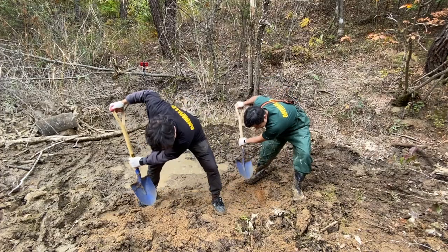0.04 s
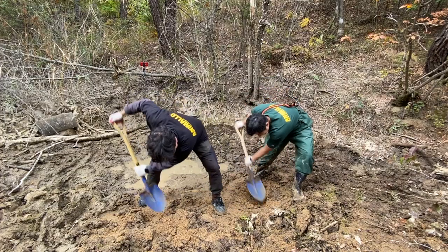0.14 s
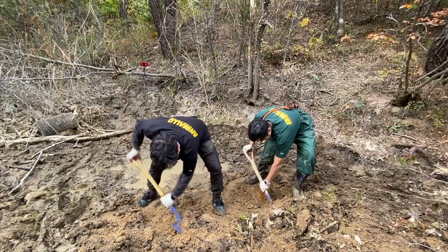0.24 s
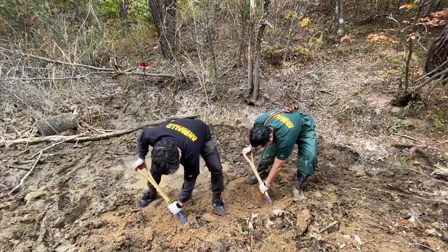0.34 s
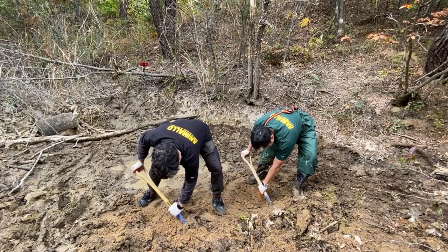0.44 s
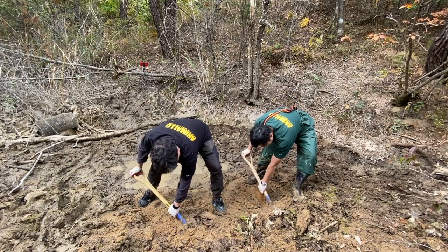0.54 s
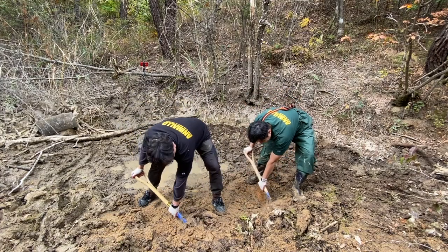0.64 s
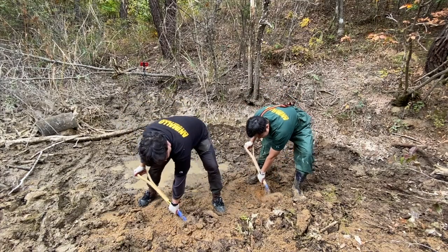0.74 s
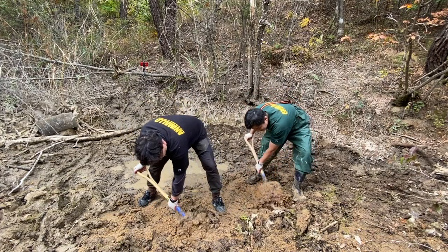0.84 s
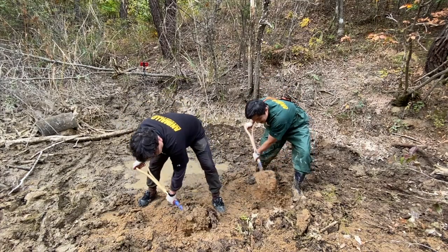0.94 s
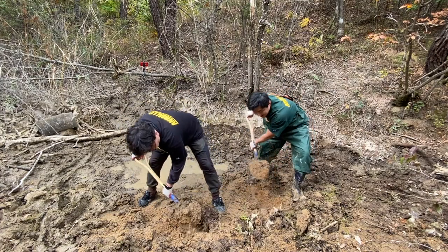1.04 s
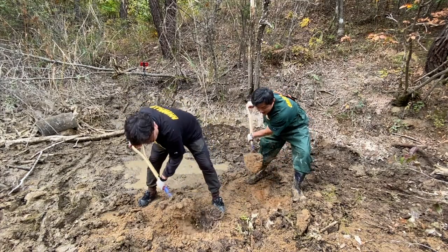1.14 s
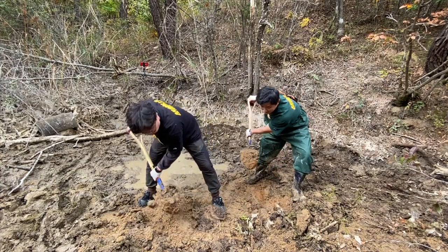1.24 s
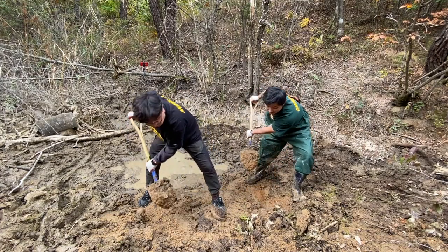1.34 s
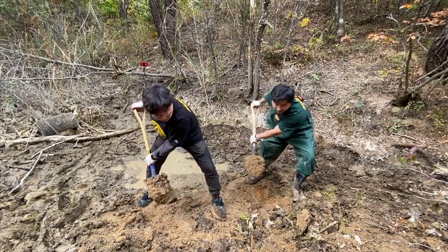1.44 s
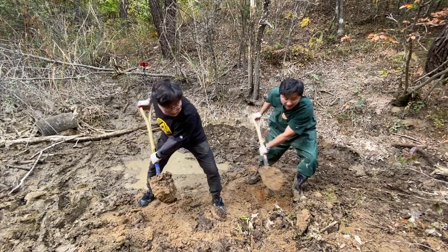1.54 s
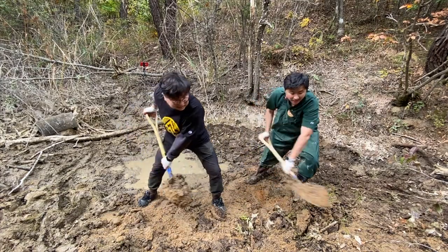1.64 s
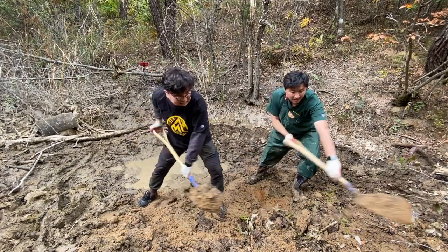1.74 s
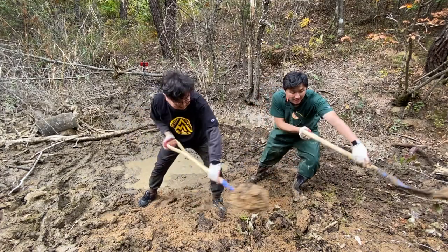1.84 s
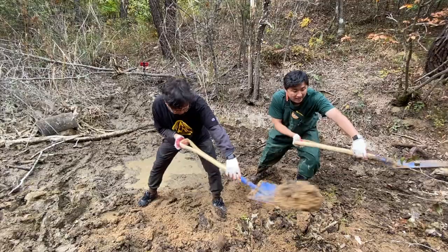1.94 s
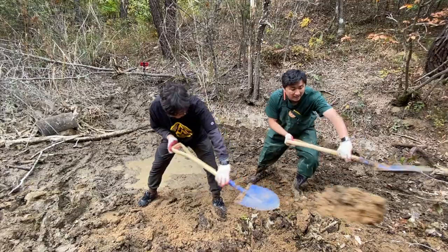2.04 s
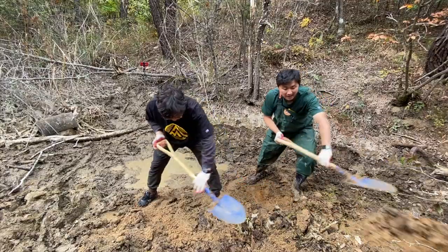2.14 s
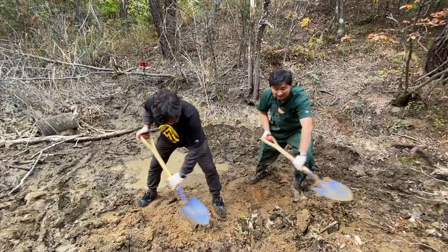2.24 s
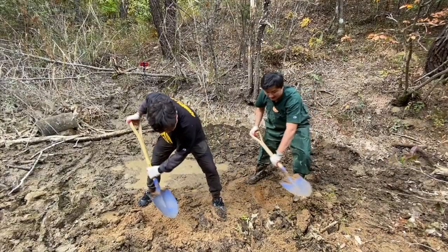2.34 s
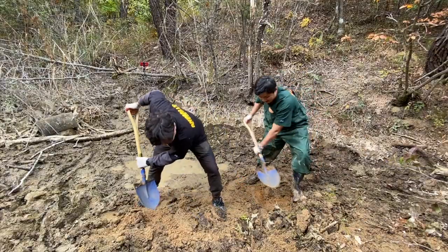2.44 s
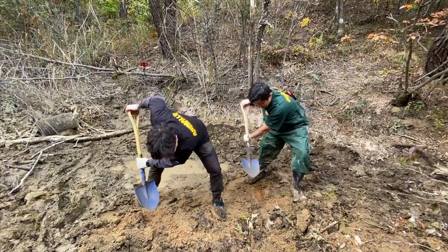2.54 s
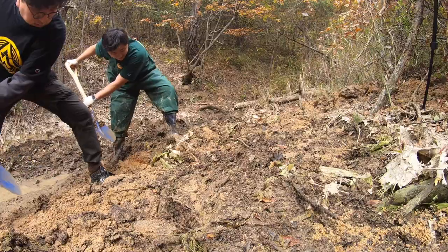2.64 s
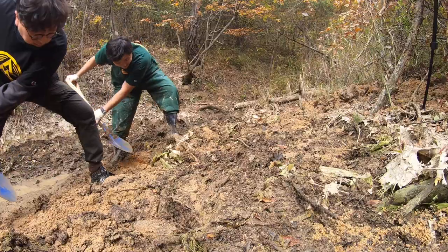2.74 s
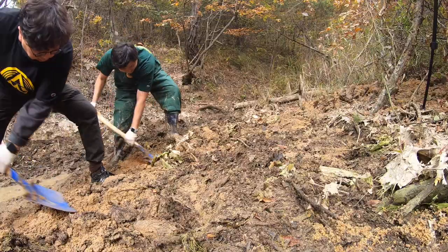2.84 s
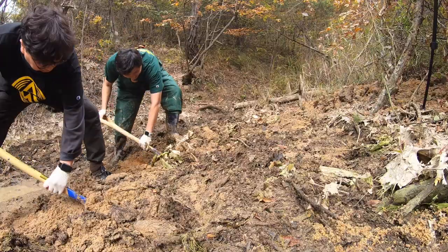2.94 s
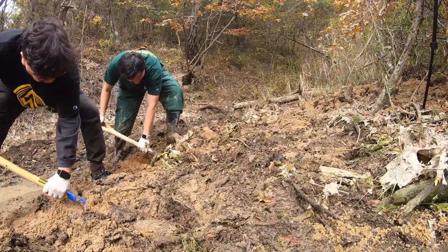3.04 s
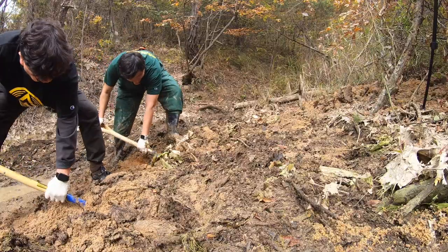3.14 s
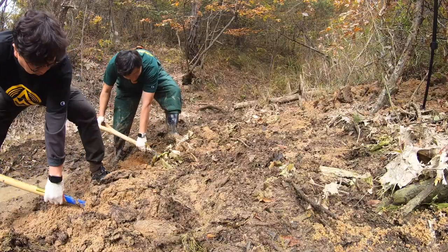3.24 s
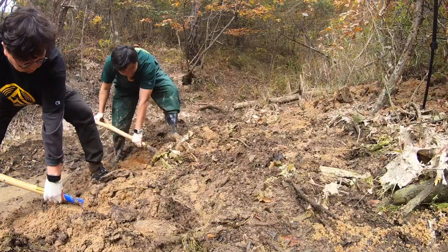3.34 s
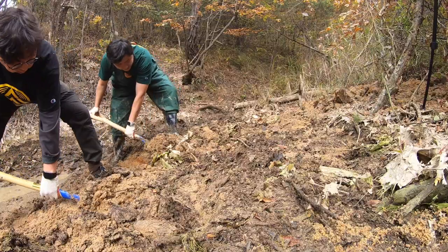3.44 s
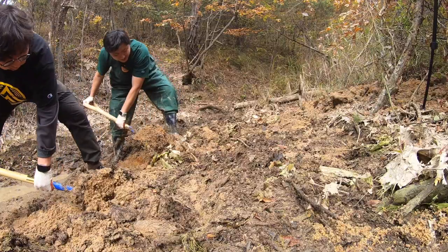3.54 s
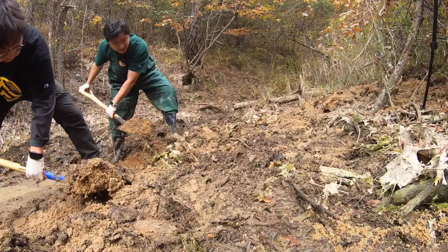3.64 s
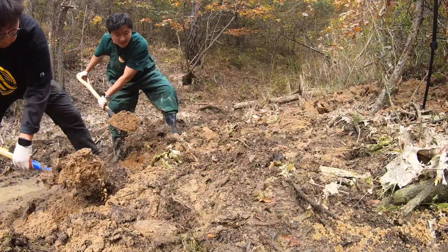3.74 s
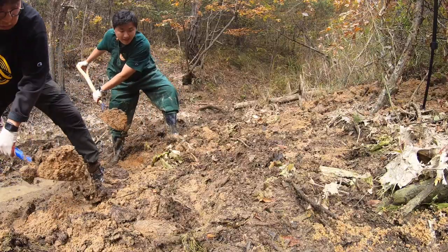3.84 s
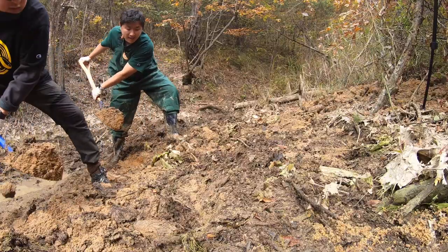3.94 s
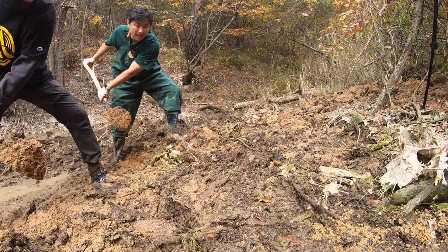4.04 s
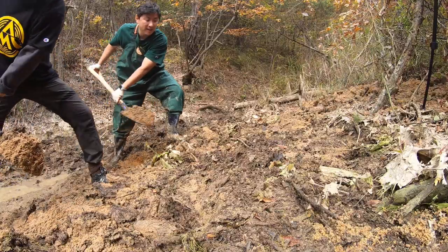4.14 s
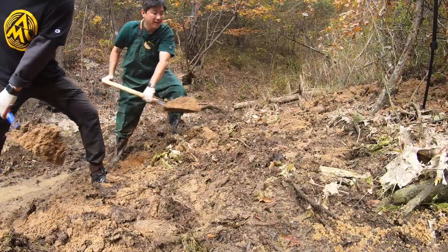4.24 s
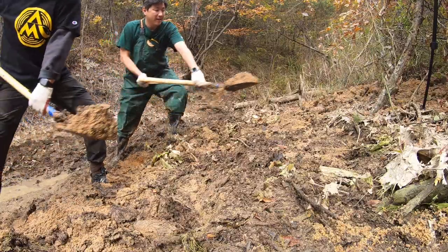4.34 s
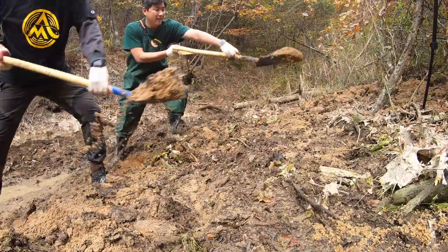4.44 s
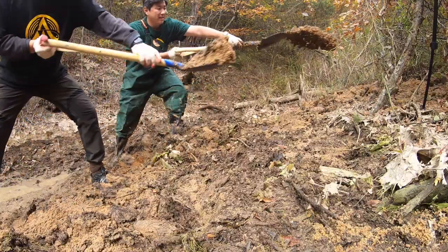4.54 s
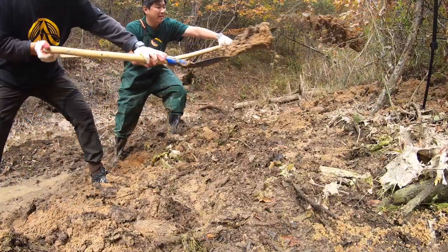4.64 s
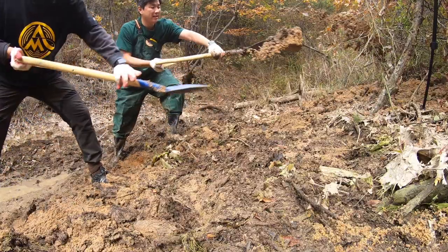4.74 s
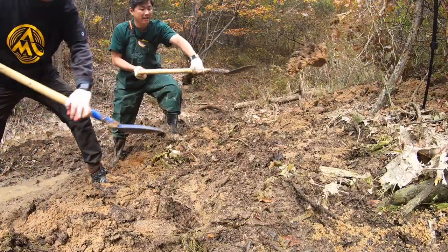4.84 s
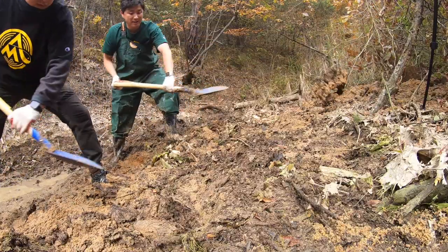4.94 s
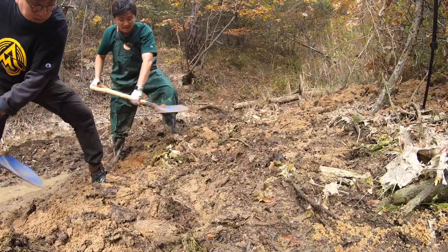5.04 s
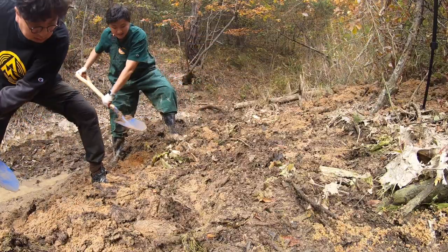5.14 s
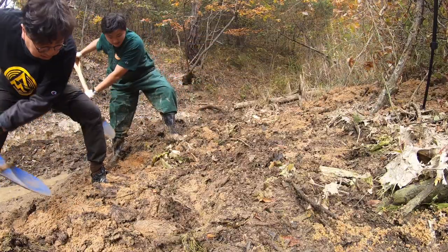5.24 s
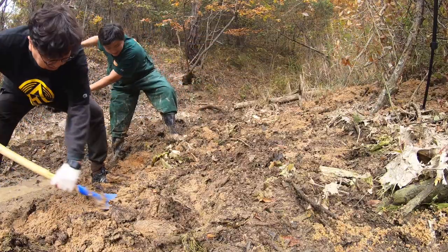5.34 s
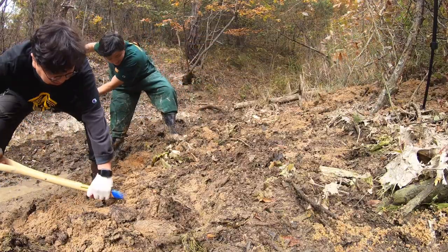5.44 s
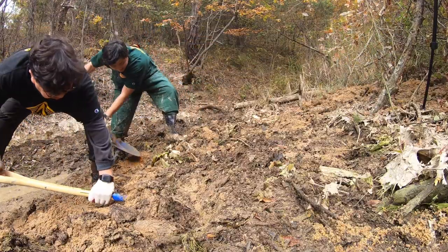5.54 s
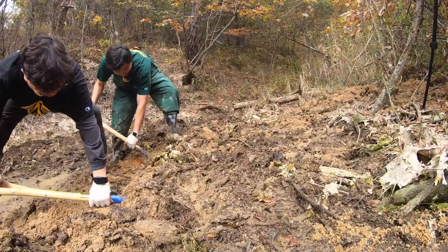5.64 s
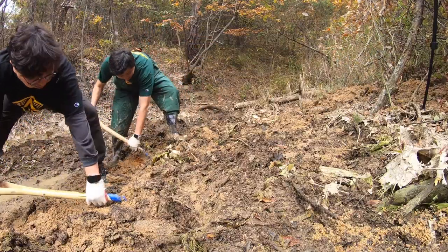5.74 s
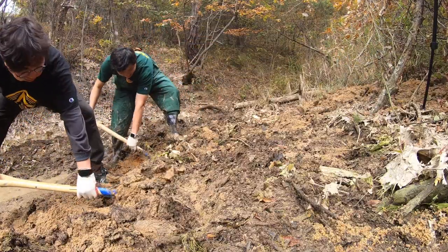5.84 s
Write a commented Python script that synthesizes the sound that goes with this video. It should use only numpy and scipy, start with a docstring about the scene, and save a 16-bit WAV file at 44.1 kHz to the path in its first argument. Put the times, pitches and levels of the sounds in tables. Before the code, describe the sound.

Steel shovel blades stab gritty wet ground, soil slides off with a hiss, and clods and crumbs land softly among trees.

```python
"""Steel shovels dig wet, gritty soil in a wood: two people stab the ground, lever up a load and fling it.
Blades, crumbs, soil and the slope's echo are clumped rows of tiny contacts, each in its own colour.
The load hisses off the blade, then lands as soft clods and a patter of crumbs; the trees answer faintly.
Decaying noise bands make the snaps, narrow noise the far whistles, steady noise the hush of the wood.
A bright microphone with spaced ports hears the first round, a duller one near the ground the second."""
import sys
import numpy as np
from scipy import signal
from scipy.fft import rfft, irfft, next_fast_len
from scipy.io import wavfile
from scipy.ndimage import map_coordinates

SR = 44100
rng = np.random.default_rng(int(sys.argv[2]) if len(sys.argv) > 2 else 0)


def log_audio(samples):
    """Write samples as a 16-bit WAV file to the path given in sys.argv[1]."""
    # one column per channel
    frames = np.atleast_2d(samples).T
    # limit to full scale, then quantise
    limited = np.clip(frames, -1, 1)
    pcm = np.round(limited * 32767).astype(np.int16)
    wavfile.write(sys.argv[1], SR, pcm)


N = 259749

SWITCH_S = 2.745  # the second microphone takes over
TIME = np.arange(N) / SR
SIZE = next_fast_len(N + SR // 2)
FREQ = np.fft.rfftfreq(SIZE, 1 / SR)

# the pit from the first microphone: (frequency [Hz], left minus right [dB])
PIT_FIRST = [(200, 2.5), (600, 2.5), (1400, 2), (2200, 4.5), (3500, -1), (5400, 9), (9000, -1)]
# the pit from the second microphone: (frequency [Hz], left minus right [dB])
PIT_SECOND = [(450, 0.41), (1150, 7.8), (2200, 5.8), (4000, 2.4), (6500, 0.5), (12000, 0.32)]
# colour of fine crumbs: (frequency [Hz], relative level [dB])
PATTER_COLOUR = [(400, -16.5), (850, -12), (1250, -3), (2000, -1), (4000, -1.5), (5800, -1.5), (10000, 0),
                 (15000, -8)]


def amp(db):
    """Decibels to gain."""
    return 10 ** (np.asarray(db) / 20)


def unit(x):
    """Scaled to rms 1."""
    return x / np.sqrt(np.mean(x ** 2) + 1e-20)


def along(points, hz=FREQ):
    """(Hz, value) points joined on a log frequency axis."""
    f, v = np.transpose(points)
    return np.interp(np.log(hz + 1), np.log(f + 1), v)


def wobble(rate):
    """A smooth random curve with rate knots a second."""
    knots = rng.standard_normal(int(N * rate / SR) + 4)
    return map_coordinates(knots, [TIME * rate])


def filtered(x, response):
    """x shaped by a response on the frequency grid."""
    return irfft(rfft(x, SIZE) * response, SIZE)[..., :N]


def noise_band(response):
    """Two unrelated rows of steady noise shaped by a response; rms 1."""
    return unit(filtered(rng.standard_normal((2, N)), response))


def resonance(hz, width):
    """One causal resonance of peak gain 1; width in Hz."""
    return 1j * FREQ * width / (hz * hz - FREQ ** 2 + 1j * FREQ * width)


def steel(ring_db):
    """Direct contact noise plus the resonances of a blade damped by soil."""
    # blade resonances: (frequency [Hz], width [Hz], relative level [dB])
    blade_modes = [(480, 150, -4.5), (814, 81, -6.5), (1448, 96, 0), (2074, 180, -6), (2740, 93, -9.5),
                   (3860, 570, -17.5), (4890, 300, -10), (5430, 120, -5)]
    ring = sum(amp(db) * resonance(hz, width) for hz, width, db in blade_modes)
    return 1 + amp(ring_db) * ring


def grains(colour, rate, spread_db, clump_db):
    """Two rows of unrelated tiny contacts, rate a second, of random size in shared clumps; rms 1."""
    contacts = (rng.random((2, N)) < rate / SR) * rng.choice([-1, 1], (2, N))
    scatter = spread_db * np.clip(rng.standard_normal((2, N)), -2, 2)
    size = amp(scatter + clump_db * wobble(170))
    return unit(filtered(contacts * size, colour))


def soil(fine, body, colour, rate, spread_db, clump_db):
    """Moving soil: fine sharp grains over the dull knocks of larger crumbs, each under its own gain."""
    # colour of larger crumbs: (frequency [Hz], relative level [dB])
    body_colour = [(60, -27), (200, 5), (500, 4), (900, 3.5), (1500, -4.5), (4000, -46)]
    sharp = fine * grains(colour, rate, spread_db, clump_db)
    dull = body * grains(amp(along(body_colour)), rate=990, spread_db=3, clump_db=2.0)
    return sharp + dull


def burst(s, t60, attack=1 / 4000):
    """A gain that jumps up at s and dies by 60 dB in t60 seconds; attack is its rise constant in seconds."""
    age = np.maximum(TIME - s, 0)
    return (1 - np.exp(-age / attack)) * amp(np.maximum(-60 * age / t60, -200))


def swell(s, length, rise_db_per_s, fall_db_per_s):
    """A gain that grows until s, holds for length seconds, then dies."""
    before, after = np.maximum(s - TIME, 0), np.maximum(TIME - s - length, 0)
    return amp(-rise_db_per_s * before - fall_db_per_s * after)


def same_round(s):
    """True for the samples heard by the microphone that is listening at s."""
    return (TIME < SWITCH_S) == (s < SWITCH_S)


def switch(first, second):
    """The first microphone hands over to the second within 2 ms."""
    share = np.clip((TIME - SWITCH_S) / .002, 0, 1)
    return first * (1 - share) + second * share


def ports(x, alike, balance, lag_ms, diffuse):
    """Two unrelated rows become left and right, partly alike; the left one lags by lag_ms."""
    # mixing at this angle gives left and right the wanted likeness
    turn = np.arccos(np.clip(along(alike), 0, 1) ** abs(diffuse)) / 2
    mid, side = rfft(x, SIZE) * [np.cos(turn), np.sin(turn)]
    sign = np.array([[1], [-1]])  # left, right
    lean = amp(sign * along(balance) / 2)
    lag_s = lag_ms / 1000
    delay = np.exp(-1j * np.pi * FREQ * sign * lag_s)  # half the lag on each side
    return irfft((mid + sign * side) * lean * delay, SIZE)[:, :N]


def heard(x, first, second, lag_ms, diffuse):
    """A source from its place at each microphone; more diffuse means less alike in left and right."""
    # left-right likeness at the first microphone: (frequency [Hz], likeness [0-1])
    alike_first = [(100, .86), (600, .85), (1500, .74), (3000, .42), (7000, .2), (10000, .45), (13000, .8)]
    # left-right likeness at the second microphone: (frequency [Hz], likeness [0-1])
    alike_second = [(100, .96), (500, .94), (1100, .68), (2000, .8), (4000, .9), (6500, .5), (9000, .1)]
    at_first = ports(x, alike_first, first, lag_ms, diffuse)
    at_second = ports(x, alike_second, second, 0, diffuse)
    return switch(at_first, at_second)


def air(spectrum, db):
    """The quiet hush of the wood: shaped noise whose level gently wavers."""
    return amp(db + 1.0 * wobble(3.9)) * noise_band(amp(along(spectrum)))


def hush():
    """The wood's hush as each microphone takes it in, nearly even from left to right."""
    # hush at the first microphone: (frequency [Hz], relative level [dB])
    air_first = [(15, -44), (25, -17.5), (59, -4), (250, -13), (450, -13), (856, -22.5), (1720, -11),
                 (4870, -13), (5280, -8), (10600, -13.5), (12100, -17.5), (13100, -8.5), (15000, -21)]
    # hush at the second microphone: (frequency [Hz], relative level [dB])
    air_second = [(15, -45), (25, -20), (60, -11), (103, -33), (150, 2.5), (354, -7.5), (450, -21.5),
                  (700, -10), (1100, -13.5), (1860, -7), (4750, -11), (7500, -13), (10000, -17),
                  (11500, -37), (15000, -46)]
    both = switch(air(air_first, db=-56), air(air_second, db=-51.5))
    return heard(both, [(1000, 0.024)], [(1000, 0.039)], lag_ms=0, diffuse=1)


def levering():
    """Wet soil tears in fits with a faint crackle; now and then a root or stone snaps as a decaying band."""
    # soil straining under a blade or a boot: (time [s], length [s], crackle gain [dB], body gain [dB])
    strains = [(0.013, .07, -58.5, -68.5), (0.916, 0.38, -56.5, -64), (1.6, 0.084, -57.5, -66),
               (3.58, .03, -46, -57.5), (3.782, 0.043, -47.5, -53.5), (3.942, 0.12, -53, -55),
               (4.244, 0.31, -50, -53.5), (5.826, 0.028, -53.5, -75)]
    # small stones and roots snapping: (time [s], gain before a common trim [dB], centre [Hz], t60 [s])
    snap_rows = [(0.897, -35.5, 4000, 0.06), (1.044, -46, 1500, .06), (1.145, -35, 5460, 0.14),
                 (1.193, -26, 452, 0.037), (1.254, -37, 4460, 0.06), (1.368, -32, 5660, 0.11),
                 (1.505, -38, 7500, .08), (3.581, -21.5, 5700, 0.041), (3.725, -24, 2830, 0.058),
                 (3.867, -20, 7250, 0.037), (3.876, -23.5, 480, 0.051), (3.929, -30, 6000, 0.09),
                 (4.045, -26.5, 5800, 0.045), (4.237, -28, 1520, 0.066), (4.659, -16, 4900, 0.16),
                 (4.833, -13.5, 2480, 0.17), (4.904, -4.5, 7400, 0.06)]
    fine, body = np.zeros((2, N))
    fits = amp(1.2 * wobble(24))  # soil gives way unevenly
    for s, length, crackle_db, body_db in strains:
        strain = fits * swell(s, length, rise_db_per_s=151, fall_db_per_s=140)
        fine += amp(crackle_db) * strain
        body += amp(body_db) * strain
    crackle = soil(fine, body, amp(along(PATTER_COLOUR)), rate=1500, spread_db=2.2, clump_db=2.2)
    for s, db, hz, t60 in snap_rows:
        snap = noise_band(resonance(hz, 0.53 * hz) ** 2)
        crackle += amp(db - 14.5) * burst(s, t60) * snap
    return heard(crackle, [(300, 0.39), (5000, 4.4)], [(300, 1.5), (2000, 1.7)], lag_ms=0.0796, diffuse=1)


def trees(x, build_s):
    """Trunks and the slope scatter a faint, slowly building echo: x convolved with dying noise."""
    # decay of the echo: (frequency [Hz], t60 [s])
    wood_t60 = [(150, 0.9), (900, 1.9), (2500, 2.7), (10000, 0.6)]
    # colour of the echo: (frequency [Hz], relative level [dB])
    echo_colour = [(100, -10), (400, -2.5), (900, -0.5), (2200, -5.5), (5000, -2), (12000, -3.5)]
    hz, t, z = signal.stft(rng.standard_normal((2, SR)), SR, nperseg=256)
    decay_db = -60 * t / along(wood_t60, hz)[:, None]
    shape = amp(along(echo_colour, hz)[:, None] + decay_db) * (1 - np.exp(-t / build_s))
    tail = signal.istft(z * shape, SR, nperseg=256)[1]
    return signal.fftconvolve(x, tail / np.linalg.norm(tail[0]), axes=1)[:, :N]


def stabs():
    """The edge clicks in, grit hisses on the blade, the crunch grows as it sinks, the ground thuds."""
    # blade stabs: (time [s], edge click gain before a trim [dB], entry gain [dB], full gain [dB], rise [s],
    # hold [s], t60 [s], crunch gain [dB], thud gain [dB], brightness above 1 kHz [dB per octave])
    stab_rows = [(.141, -14, -19, -13, 0.04, 0.016, 0.2, -15, -28, 2.5),
                 (2.64, -42.5, -28, -12.5, 0.0077, 0.026, 0.19, -17, -24.5, 3.5),
                 (2.822, -11.5, -12, -13.5, 0.029, 0.024, 0.26, -14.5, -16, 1.5),
                 (5.315, -31, -31, -10, 0.0093, 0.026, 0.23, -14.5, -14, 0.5),
                 (5.563, -14, -22.5, -16, 0.052, 0.013, 0.25, -19, -25.5, 0)]
    # colour of grit on the blade: (frequency [Hz], relative level [dB])
    grit_colour = [(120, -22), (300, -19.5), (600, -13.5), (1500, -3), (3000, 3.5), (5500, -1), (8000, -5),
                   (10500, 1.5), (15000, -7.5)]
    # colour of the sinking blade: (frequency [Hz], relative level [dB])
    crunch_colour = [(100, -15), (400, -4), (850, -2), (1500, -2), (2500, -9), (6000, -27), (12000, -36.5)]
    # colour of the ground: (frequency [Hz], relative level [dB])
    thud_colour = [(25, -32.5), (60, -21), (170, 0), (450, -1.5), (900, 1.5), (1500, -9), (4000, -51.5)]
    grinding = np.zeros((2, N))
    click, crunch, thud = np.zeros((3, N))
    grit = amp(along(grit_colour)) * steel(ring_db=5.0)
    octaves = np.log2(np.maximum(FREQ, 1000) / 1000)
    for s, click_db, entry_db, full_db, rise, hold, t60, crunch_db, thud_db, bright_db in stab_rows:
        live = (TIME > s) & same_round(s)
        stop = s + rise + hold
        dying = -60 * np.maximum(TIME - stop, 0)
        sinking = [s, stop - .008]
        force = live * amp(np.interp(TIME, [s, s + rise], [entry_db, full_db]) + dying / t60)
        bright_grit = grit * amp(bright_db * octaves)
        grinding += force * grains(bright_grit, rate=12000, spread_db=4.5, clump_db=0.5)
        click += amp(click_db - 1.5) * burst(s, t60=.035)
        crunch += live * amp(crunch_db + np.interp(TIME, sinking, [-20, 0]) + dying / 0.17)
        thud += live * amp(thud_db + np.interp(TIME, sinking, [-22, 0]) + dying / 0.28)
    edge = click * grains(grit * resonance(3700, 3400), rate=13000, spread_db=3.0, clump_db=-0.5)
    sinking_colour = amp(along(crunch_colour)) * steel(ring_db=7.5)
    blade = crunch * grains(sinking_colour, rate=7700, spread_db=2, clump_db=2)
    ground = thud * grains(amp(along(thud_colour)), rate=3000, spread_db=7, clump_db=2.5)
    return heard(grinding + edge + blade + ground + stones(), PIT_FIRST, PIT_SECOND, lag_ms=-0.138, diffuse=1.0)


def stones():
    """Each stone the sinking blade grinds past gives it a brief, hard jolt in one band."""
    # stones in the cut: (time [s], gain [dB], centre [Hz])
    stone_rows = [(0.176, -5, 2230), (0.181, -7, 1490), (.188, -3, 865), (2.651, -14.5, 2240),
                  (2.667, -32, 980), (2.854, -3, 2560), (2.867, -13, 724), (5.342, -20, 950),
                  (5.359, -28, 585), (5.607, -8.5, 2620)]
    jolts = np.zeros((2, N))
    for s, db, hz in stone_rows:
        scrape = grains(resonance(hz, 0.45 * hz) ** 2, rate=6000, spread_db=0.0, clump_db=3.0)
        jolts += amp(db) * burst(s, t60=0.022) * scrape
    return jolts


def slope_echo():
    """A dull, mid-band echo of the stabs comes back off the slope, rising quickly and fading."""
    # echoes of the stabs: (time [s], length [s], gain [dB])
    echoes = [(.3, 0.24, -59.5), (2.925, 0.011, -41.5), (3.12, 0.034, -48), (5.4, 0.0092, -35),
              (5.49, 0.015, -57)]
    # colour of the slope's echo: (frequency [Hz], relative level [dB])
    slope_colour = [(200, -21.5), (500, -5), (850, 3), (1400, -5.5), (2100, -10.5), (4000, -16),
                    (10000, -28.5)]
    level = np.zeros(N)
    for s, length, db in echoes:
        level += amp(db) * swell(s, length, rise_db_per_s=153, fall_db_per_s=85)
    echo = level * grains(amp(along(slope_colour)), rate=800, spread_db=2.0, clump_db=-1.0)
    return heard(echo, PIT_FIRST, PIT_SECOND, lag_ms=-.138, diffuse=1.7)


def whistles():
    """Faint, thin, fuzzy tones from afar: narrow noise, the same left and right, that swells and fades."""
    # whistles: (middle [s], length between the -13.5 dB points [s], centre [Hz], gain [dB])
    whistle_rows = [(0.946, 0.487, 1936, -66.5), (2.765, 0.18, 5160, -53), (3.512, 0.83, 1895, -62),
                    (3.56, 0.26, 5320, -56), (3.597, 0.11, 4040, -54), (5.74, .22, 4930, -53),
                    (5.88, 0.071, 1895, -51)]
    tones = np.zeros(N)
    for s, length, hz, db in whistle_rows:
        narrow = unit(filtered(rng.standard_normal(N), resonance(hz, 0.024 * hz) ** 2))
        tones += amp(db - 54 * ((TIME - s) / length) ** 2) * narrow
    return tones


def slides():
    """The flung load rasps along the steel; a broad resonance glides upward as it slides off."""
    # loads sliding off: (time [s], length [s], hiss gain [dB], body gain [dB], start rasp [Hz], end rasp [Hz])
    loads = [(1.733, 0.087, -32, -47.5, 4300, 5000), (1.859, 0.063, -30.5, -46, 1550, 2420),
             (4.41, 0.19, -20, -42, 2270, 2870)]
    # colour of soil on steel: (frequency [Hz], relative level [dB])
    slide_colour = [(500, -28), (1050, -6.5), (1450, -3), (2700, -2.5), (5000, -6.5), (8000, -4.5),
                    (11000, -1.5), (15000, -8)]
    # the throw from the first microphone: (frequency [Hz], left minus right [dB])
    throw_first = [(200, 1.5), (1000, -8.5), (2500, 2), (5500, 2.5), (10000, -0.5)]
    # the throw from the second microphone: (frequency [Hz], left minus right [dB])
    throw_second = [(300, 3.5), (900, 6), (1500, -1), (4000, 0.5), (10000, 1)]
    colour = amp(along(slide_colour)) * steel(ring_db=1.5)
    rasp = np.zeros((2, N))
    for s, length, hiss_db, body_db, start_hz, end_hz in loads:
        # the load gets moving, and runs off the edge
        flow = swell(s, length, rise_db_per_s=382, fall_db_per_s=448)
        load = soil(amp(hiss_db) * flow, amp(body_db) * flow, colour, rate=7000, spread_db=1, clump_db=0.5)
        rasp += swept(load, [(s, start_hz), (s + length, end_hz)], lift_db=5.0, width_octaves=1.0)
    return heard(rasp, throw_first, throw_second, lag_ms=0.18, diffuse=0.82)


def swept(x, centres, lift_db, width_octaves):
    """A broad resonance whose centre follows (s, Hz) rows."""
    hz, t, z = signal.stft(x, SR, nperseg=512)
    centre = np.interp(t, *np.transpose(centres))
    away = np.log2((hz[:, None] + 1) / centre) / width_octaves
    return signal.istft(z * amp(lift_db * np.exp(-away ** 2)), SR, nperseg=512)[1][:, :N]


def landings():
    """A shower of crumbs thickens and thins; in its midst soft clods thump onto the heap and burst."""
    # clods landing: (time [s], gain before the trims [dB])
    clod_rows = [(2.252, -24.5), (2.3, -23.5), (2.384, -41.5), (2.45, -35), (2.56, -39), (4.93, -23),
                 (4.972, -23), (5.01, -39)]
    # loads raining on the heap: (thickest at [s], patter gain [dB], body gain [dB])
    showers = [(2.312, -28, -37.5), (4.998, -21.5, -35)]
    # colour of a clod's thump: (frequency [Hz], relative level [dB])
    clod_colour = [(20, -33), (55, -10.5), (95, -4.5), (150, 1.5), (210, -2), (300, -7), (600, -53),
                   (2000, -62)]
    # the spoil heap from the first microphone: (frequency [Hz], left minus right [dB])
    heap_first = [(200, 0.5), (550, -4.5), (1300, 0), (1900, -2.5), (3500, -2.5), (5700, 9.5), (9500, -0.5)]
    # the spoil heap from the second microphone: (frequency [Hz], left minus right [dB])
    heap_second = [(400, 1), (1500, -5.5), (3500, -2.5), (6000, 1.5), (12000, 1.5)]
    # the heap at the first microphone: (frequency [Hz], left lag [ms])
    heap_lag = [(150, 0.88), (520, 0.54), (1460, 0.4), (9000, 0.384), (14000, 0.39)]
    attack_s, spray_db, splat_db = .005, -14, -15.5
    weight = sum(amp(db) * burst(s, .17, attack_s) for s, db in clod_rows)
    # a clod bursts into crumbs and a longer spray of fine grit
    fine = sum(amp(db + spray_db) * burst(s, 1, attack_s) for s, db in clod_rows)
    body = amp(splat_db) * weight
    lead_s, onset_s = .41, 0.047  # the first crumbs land this long before the thickest moment, within this time
    for s, patter_db, body_db in showers:
        falling = same_round(s) * np.clip((TIME - s + lead_s) / onset_s, 0, 1)
        fine += amp(patter_db) * falling * swell(s, 0, rise_db_per_s=32, fall_db_per_s=42.5)
        body += amp(body_db) * falling * swell(s, 0, rise_db_per_s=64.5, fall_db_per_s=27)
    patter = soil(fine, body, amp(along(PATTER_COLOUR)), rate=6000, spread_db=1.3, clump_db=0.78)
    thumps = amp(-1.0) * weight * noise_band(amp(along(clod_colour)))
    return heard(patter + thumps, heap_first, heap_second, lag_ms=along(heap_lag), diffuse=0.99)


def scene():
    """Digging in each microphone's colour, with its echo, the far whistles and the hush around it."""
    # colour of the first, bright microphone: (frequency [Hz], gain [dB])
    bright = [(60, 3.5), (160, -4.5), (450, -0.5), (1000, 2), (3000, 5), (7000, 3), (10000, 2.5),
              (15000, 1.5)]
    # colour of the second, dull microphone: (frequency [Hz], gain [dB])
    dull = [(100, 0), (1000, -3), (3000, 1.5), (7000, 2), (10000, -6.5), (12000, -20.5), (15000, -18)]
    work = levering() + stabs() + slope_echo() + slides() + landings()
    work = work + amp(-41.0) * trees(work, build_s=0.17)
    work = switch(filtered(work, amp(along(bright))), filtered(work, amp(along(dull))))
    return work + whistles() + hush()


def record(dry):
    """The first microphone has a notch about 12 kHz; peaks round off at full scale under a band limit."""
    notch = 1 / np.sqrt(1 + (650 / (np.abs(FREQ - 12050) + 1)) ** 12)
    x = switch(filtered(dry, np.maximum(notch, amp(-34.5))), dry)
    x = x / (1 + np.abs(x) ** 6) ** (1 / 6)
    top_hz = 15400
    return filtered(x, 1 / (1 + (FREQ / top_hz) ** 120))


dry = scene()
out = record(dry)
log_audio(out)
```